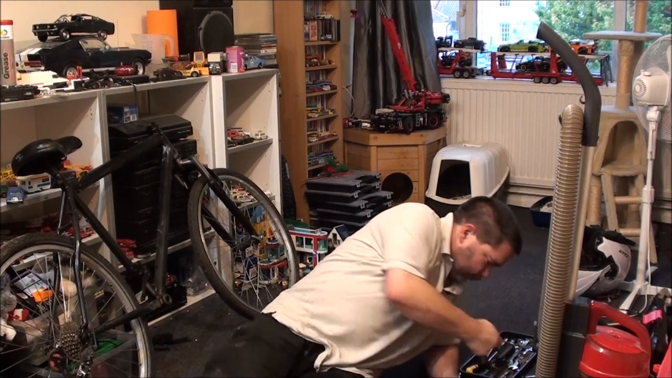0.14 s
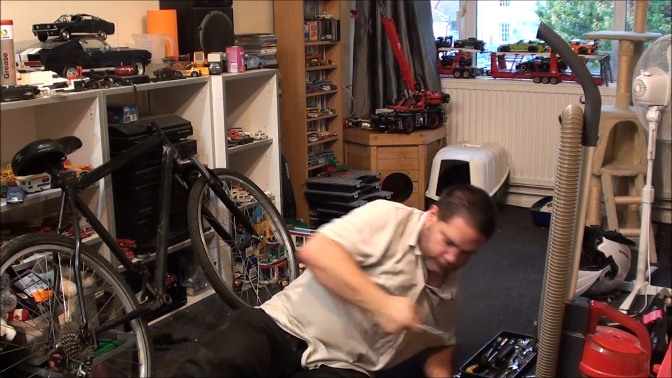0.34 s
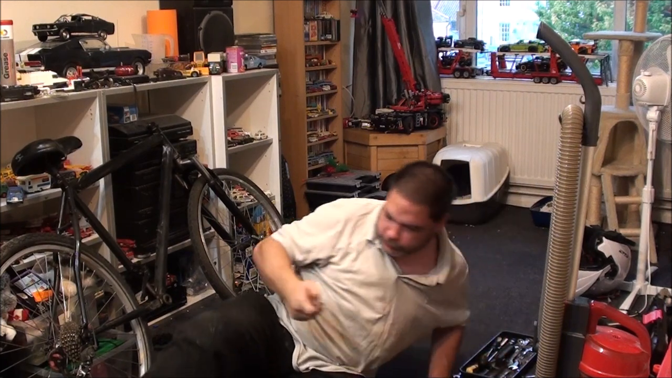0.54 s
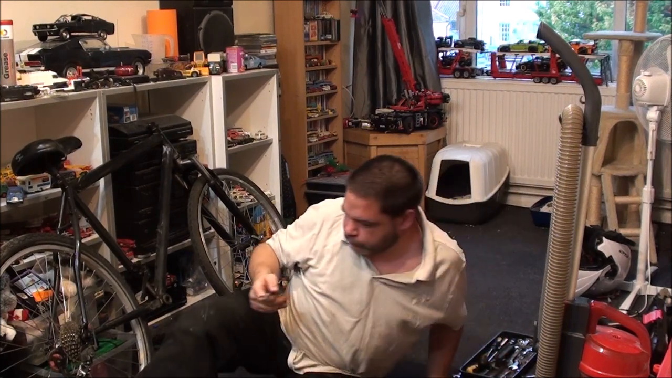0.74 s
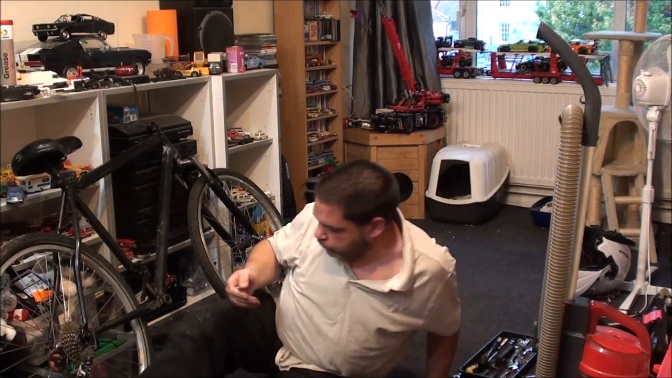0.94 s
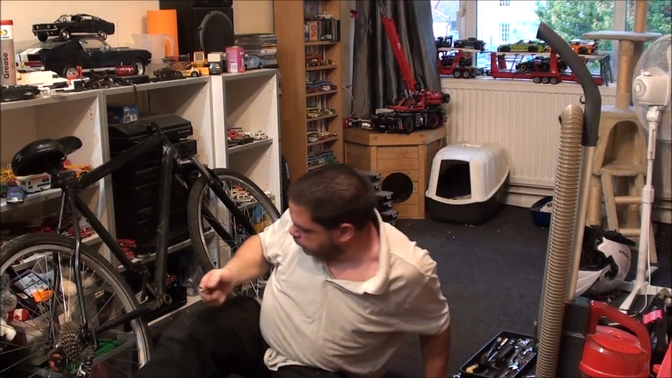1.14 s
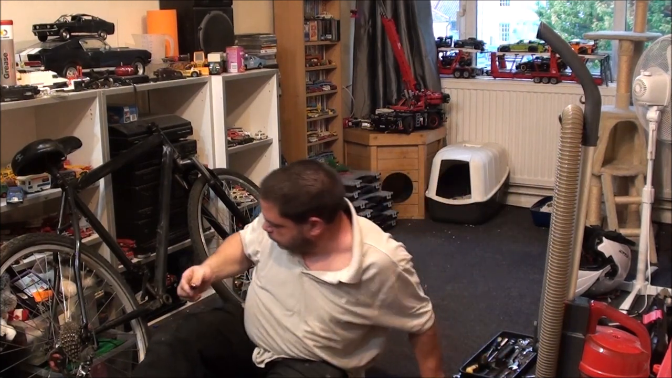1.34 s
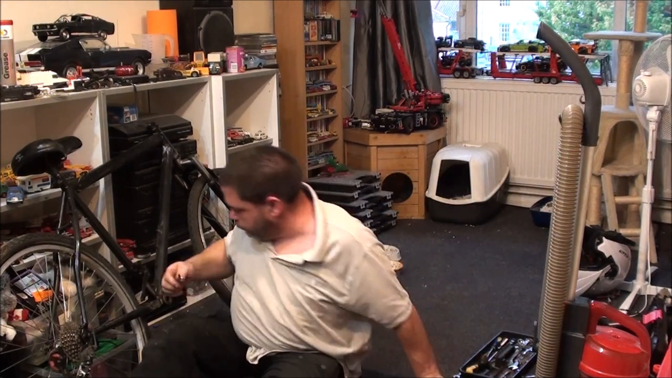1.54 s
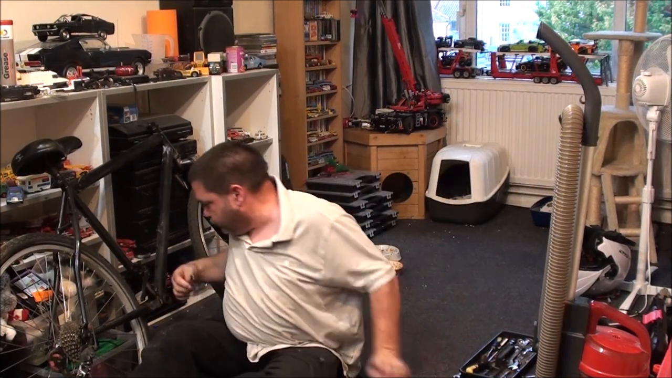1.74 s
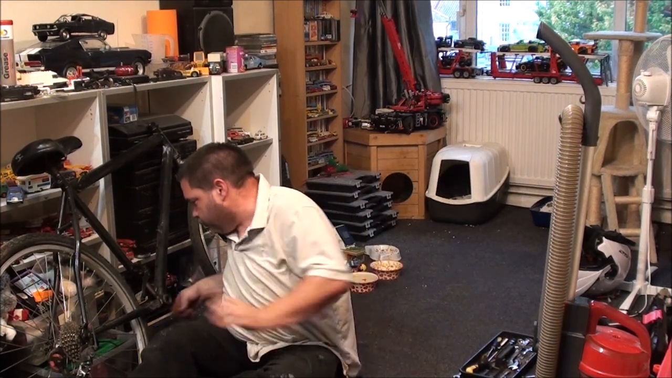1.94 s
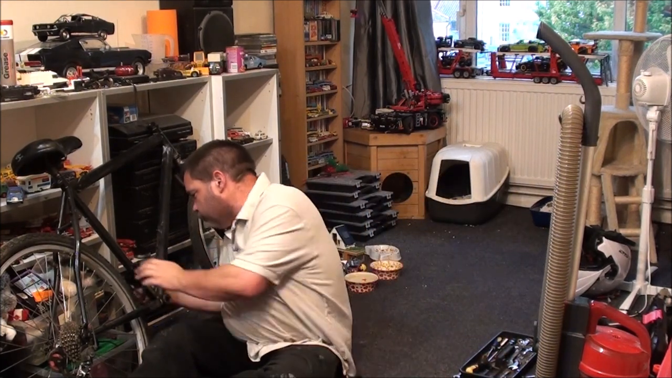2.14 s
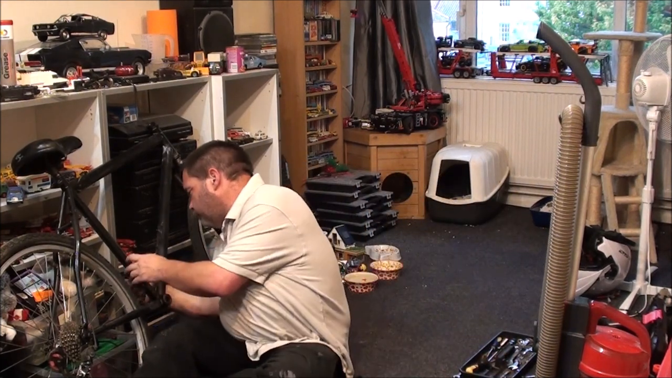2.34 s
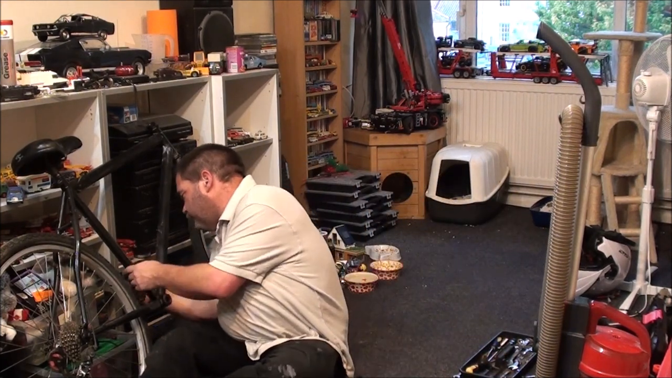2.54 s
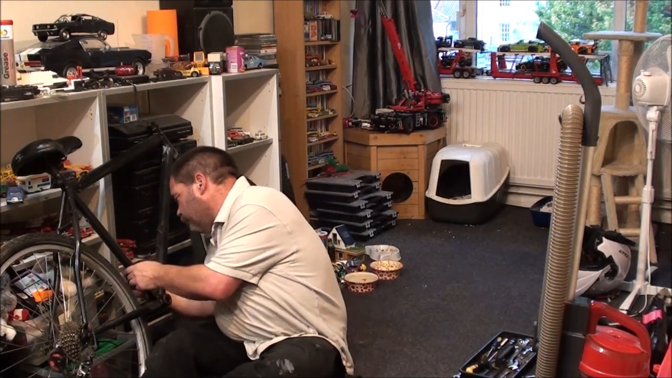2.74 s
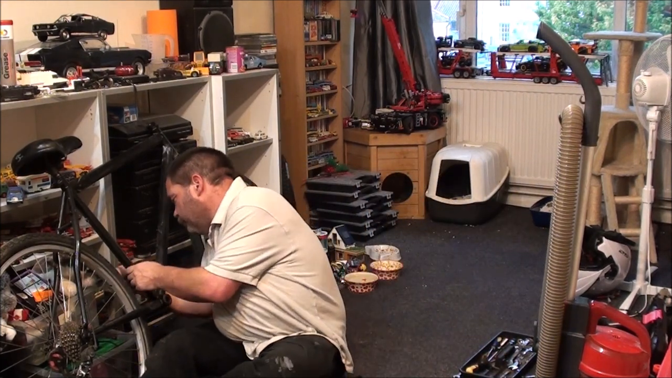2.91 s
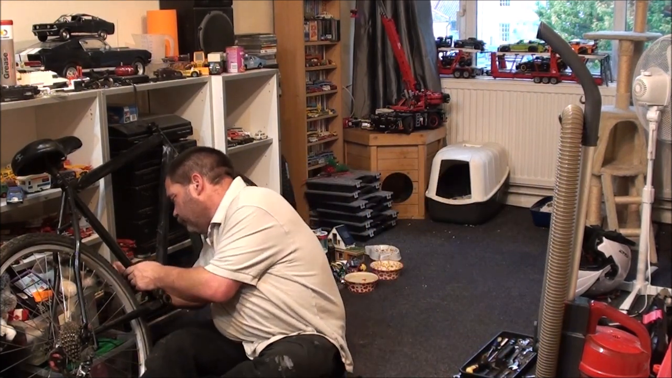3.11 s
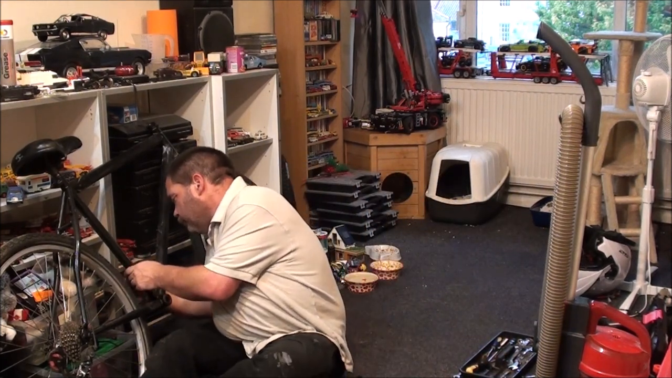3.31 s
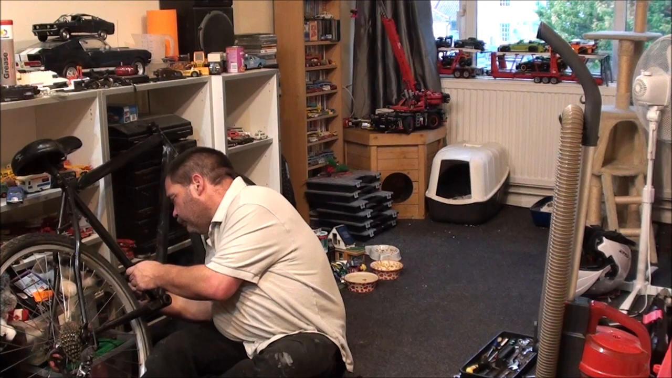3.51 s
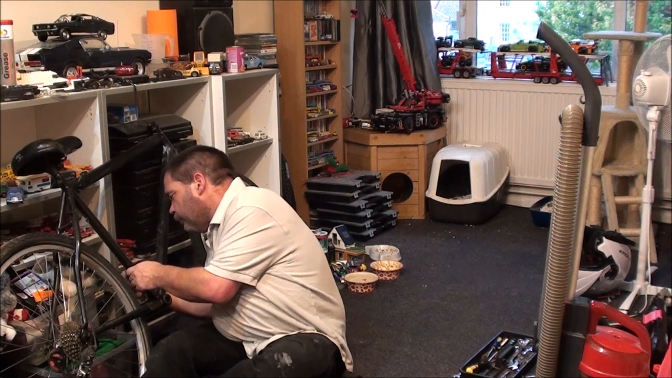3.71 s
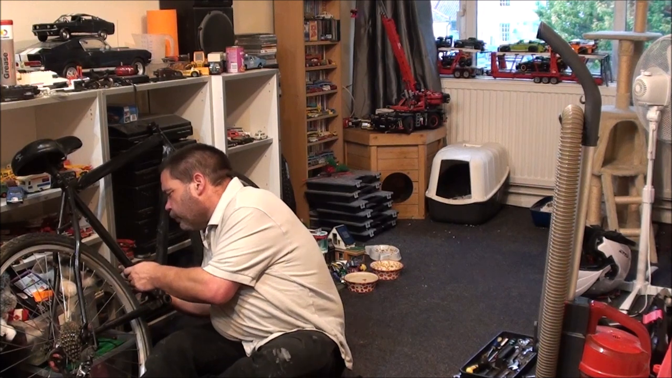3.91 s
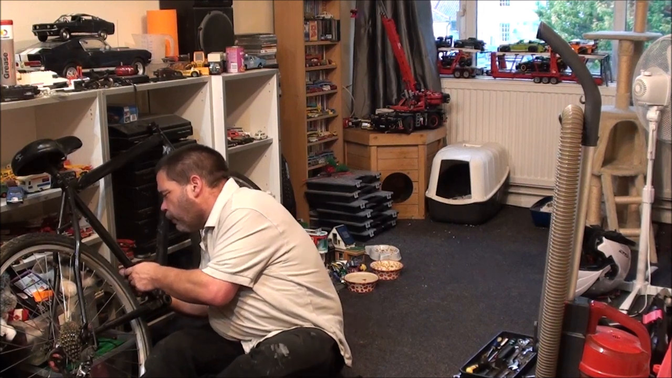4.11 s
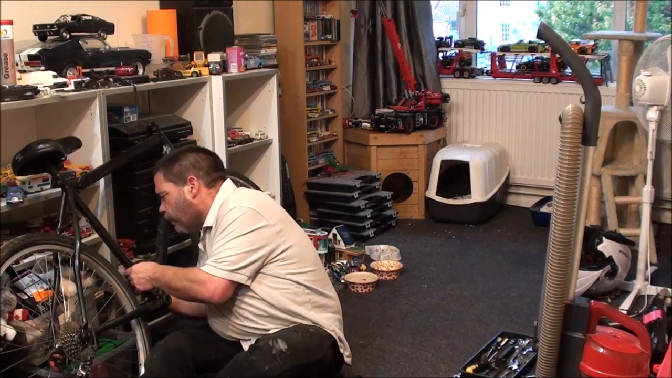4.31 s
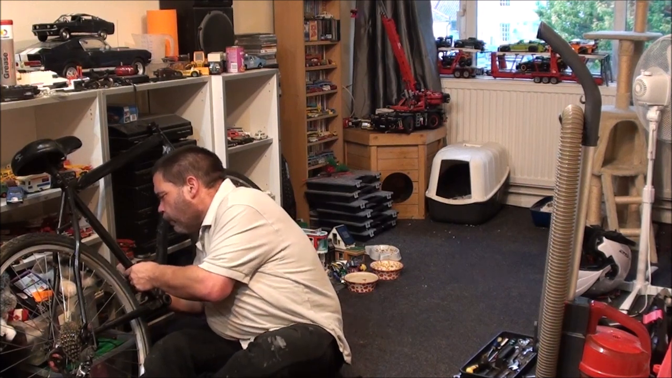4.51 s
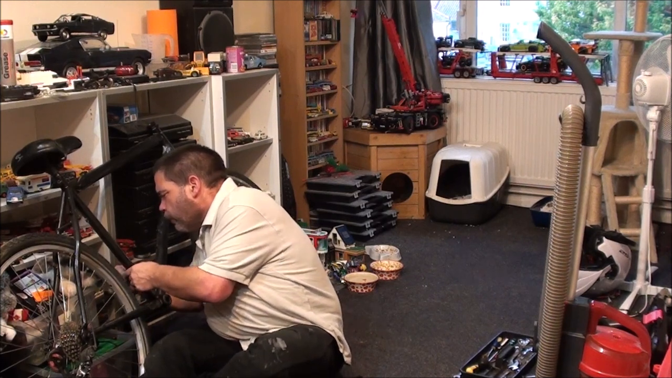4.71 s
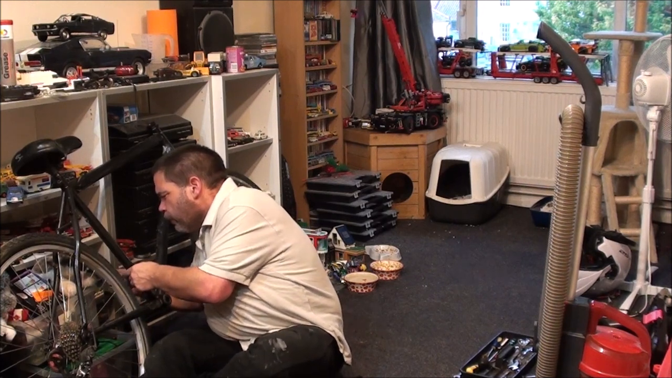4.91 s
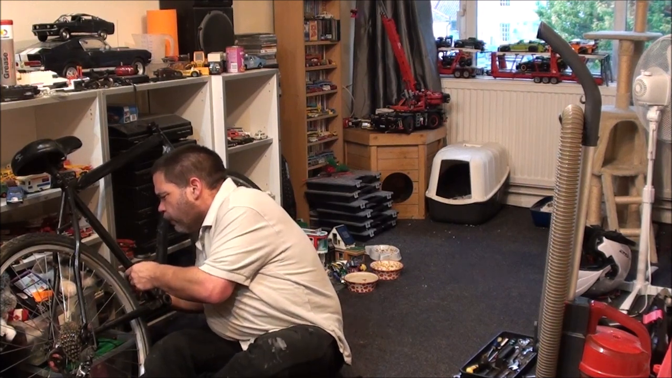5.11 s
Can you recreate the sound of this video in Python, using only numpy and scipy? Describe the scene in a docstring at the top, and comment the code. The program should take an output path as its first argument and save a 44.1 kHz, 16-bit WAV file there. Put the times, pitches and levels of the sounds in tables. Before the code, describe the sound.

In a small, cluttered carpeted room, a quiet fan gives a wavering mid-low tone over faint hum, hiss and air. Within the first 0.1 s, tiny bright steel clinks speed into a stronger ringing touch and a duller double clack as tools fall back in a tray. Cloth rubs at the start and again around 0.3 s; at 0.44-0.49 s the plastic tray gives three rapid hollow knocks. Shirt rustle continues near 0.6 and 0.9 s, with a soft thump on the carpet, then a fainter rub around 1.5 s. A light metallic snap comes at 2.4 s, a harder one at 2.65 s amid rustling. At 3.36 s a very loud, bright metal crack rings briefly in short dense echoes, and the recording level drops, recovering slowly. A barely audible tick follows at 4.05 s, a modest duller clack at 4.37 s, a tiny dry click at 4.55 s and faint cloth movement.

```python
"""Small, cluttered room: a man picks a steel tool out of a plastic tray; tools clink, the tray knocks on the floor.
His shirt rustles as he sits up and turns to a bicycle, where the tool snaps against a fitting a few times.
Blows are contact clicks plus damped modes, heard through dense echoes; rubs and thumps are swelling noise.
A fan hums quietly: a wavering tone over faint hum, hiss and air noise.
The loudest snap pushes the recorder's gain down, and it creeps back slowly."""
import sys
import numpy as np
from scipy import signal
from scipy.fft import rfft, irfft
from scipy.io import wavfile
from scipy.ndimage import uniform_filter1d

SR = 44100
rng = np.random.default_rng(int(sys.argv[2]) if len(sys.argv) > 2 else 0)


def persist_wave(psi):
    """Save psi, clipped to +-1, as 16-bit WAV."""
    counts = np.round(np.clip(psi, -1, 1) * 32767).astype(np.int16)
    wavfile.write(sys.argv[1], SR, np.atleast_2d(counts).T)


N = 227458
T = np.arange(N) / SR
HZ = np.arange(N // 2 + 1) * SR / N

# contact spectrum of steel on steel: freq_hz, relative_db
STEEL_CONTACT = [(1000, -4.5), (2500, -3), (5500, -6), (8000, -1), (12000, -5), (16000, -11)]
# stereo width of the echoes of near sounds: freq_hz, side_to_mid_db
ROOM_STEREO = [(150, -43), (600, -19), (1200, -15), (2000, -15.5), (4000, -13), (8000, -13), (12000, -20),
               (16000, -31)]


def from_db(db):
    """Decibels to gain."""
    return 10 ** (np.asarray(db) / 20)


def rms_one(x):
    """Scale to rms 1."""
    return x / np.sqrt(np.mean(x ** 2) + 1e-20)


def blow_level(x):
    """Scale a blow so that its energy equals that of rms 1 for a fiftieth of a second."""
    return x / np.sqrt(np.sum(x ** 2) / (SR / 50) + 1e-20)


def at_hz(points, hz):
    """Read a table on a log-frequency axis."""
    freq_hz, value = np.transpose(points)
    return np.interp(np.log(np.maximum(hz, 1)), np.log(freq_hz), value)


def wander(turns_per_s):
    """Random line of spread about 1 with this many turns a second."""
    return np.interp(T * turns_per_s, np.arange(N), rng.standard_normal(N))


def swells(rows, steepness=2.36):
    """Gain over time: each row (middle_s, length_s, level_db) exceeds half its height for its length."""
    gain = 0
    for middle_s, length_s, level_db in rows:
        offset = np.abs(2 * (T - middle_s) / length_s)
        gain = gain + from_db(level_db) * .5 ** (offset ** steepness)
    return gain


def noise(gain, stereo):
    """Stereo noise of rms 1 with this gain per frequency and this stereo width."""
    mid, side = rfft(rng.standard_normal((2, N))) * gain
    side = side * from_db(at_hz(stereo, HZ))
    return rms_one(irfft([mid + side, mid - side], N))


def tone(hz, level_db, waver_db=3.0, waver_radians=0.31):
    """Sine around this rms level that wavers a little in level and phase."""
    amplitude = np.sqrt(2) * from_db(level_db + waver_db * wander(4.57))
    return amplitude * np.sin(2 * np.pi * hz * T + waver_radians * wander(5.7))


def contact(spectrum, colour=lambda hz: 0, size=4096):
    """Contact click: the shortest causal (minimum-phase) pulse with this spectrum."""
    hz = np.arange(size // 2 + 1) * SR / size
    cepstrum = irfft(np.log(from_db(at_hz(spectrum, hz) + colour(hz))))
    causal = 2 * cepstrum[:size // 2]
    return blow_level(irfft(np.exp(rfft(causal, size))))


def ringing(modes, colour=lambda hz: 0, rise_s=0.00055):
    """Damped sines of a struck body; later echoes make each one flutter in level and phase."""
    t = T[:SR // 2]
    turns = t * 90   # echo changes, 90 per second
    # the first instant is pure direct sound, then the echoes take their share
    echo_share = 1 - np.exp(-t / .02)
    rise = 1 - np.exp(-t / rise_s)   # the blow takes a moment to spread
    out = 0
    for hz, db, t60_s in modes:
        echo_points = rng.standard_normal(64) + 1j * rng.standard_normal(64)
        echoes = np.interp(turns, np.arange(64), echo_points)
        wave = (1 + echo_share * echoes) * np.exp(2j * np.pi * (hz * t + rng.random()))
        envelope = np.exp(-np.log(1000) * t / t60_s) * rise
        out = out + from_db(db + colour(hz)) * blow_level(wave.real * envelope)
    return blow_level(out)


def play(hits, sound):
    """Place a sound at each (start_s, level_db)."""
    out = np.zeros(N)
    for start_s, level_db in hits:
        start = max(round(start_s * SR), 0)
        out[start:start + len(sound)] += from_db(level_db) * sound[:N - start]
    return out


def room_response(direct_db=-17, lumpy_db=1.5):
    """Clutter scatters the sound at once into dense echoes, which die soonest in the top treble."""
    # reverberation: freq_hz, t60_s
    decay = [(150, 0.27), (600, 0.19), (1500, 0.21), (4000, 0.23), (7000, 0.21), (11000, 0.17),
             (16000, 0.12)]
    t = T[:SR // 2]
    lumpy_noise = noise(1, ROOM_STEREO) * from_db(lumpy_db * wander(689))
    echoes = rfft(lumpy_noise[:, :len(t)])
    hz = np.linspace(0, SR / 2, echoes.shape[1])
    centres_hz = [freq_hz for freq_hz, t60_s in decay]
    out = 0
    for (freq_hz, t60_s), only_this in zip(decay, np.eye(len(centres_hz))):
        band = irfft(echoes * np.interp(hz, centres_hz, only_this), len(t))
        out = out + band * np.exp(-np.log(1000) * t / t60_s)
    out = out / np.sqrt(np.sum(out ** 2) / 2)
    out[:, 0] += from_db(direct_db)
    return out


def in_room(crack, ring, ring_wet_db):
    """The crack of a blow arrives mostly as echoes; the ring comes straight and with a share of them."""
    sent = crack + from_db(ring_wet_db) * ring
    return ring + signal.fftconvolve([sent], room_response(), axes=1)[:, :N]


def struck(hits, spectrum, modes, crack_db, ring_db, ring_wet_db):
    """Blows on one body: a contact click and its modes."""
    crack = from_db(crack_db) * play(hits, contact(spectrum))
    ring = from_db(ring_db) * play(hits, ringing(modes))
    return in_room(crack, ring, ring_wet_db)


def lifted_tool():
    """The steel tool being lifted: light touches excite its modes."""
    # touches: start_s, level_db
    hits = [(.018, -27.5), (.0305, -23.5), (.041, -35.5)]
    # modes: freq_hz, relative_db, t60_s
    modes = [(1160, -2.5, 0.14), (2150, -6, 0.099), (5090, -6, 0.11), (5570, -11, .1), (5660, -13, 0.088),
             (6440, 2, 0.078), (7200, -8, 0.12), (9250, -13, .1), (10800, -17, .2), (11740, -2, 0.17),
             (12910, -14, .13)]
    return struck(hits, STEEL_CONTACT, modes, crack_db=-10.5, ring_db=-1.0, ring_wet_db=-18)


def bumped_tool():
    """The tool it bumps into: steel contact and high modes."""
    # touches: start_s, level_db
    hits = [(.0725, -18), (.0855, -27)]
    # modes: freq_hz, relative_db, t60_s
    modes = [(6280, -5, 0.2), (7140, -1, 0.26), (8543, -7.5, 0.24), (9800, -18, 0.4), (11380, 3, 0.2),
             (11600, -15, 0.17), (12330, -13, 0.23), (14050, -12, 0.18), (14800, -10, .17)]
    return struck(hits, STEEL_CONTACT, modes, crack_db=-9.5, ring_db=1.0, ring_wet_db=-18)


def dropping_tools():
    """Tools dropping back among the others: a duller clack and lower modes."""
    # blows: start_s, level_db
    hits = [(.0855, -15), (.0995, -19.5)]
    # modes: freq_hz, relative_db, t60_s
    modes = [(870, -4, 0.29), (919, 3.5, 0.091), (1090, 3, 0.14), (1157, 0, 0.17), (1286, -5, 0.16),
             (2110, 0, 0.26), (2440, -7.5, 0.17), (3810, -4.5, 0.071), (4506, -17, .16), (4900, -18, .17),
             (5109, -18, .15)]
    # contact spectrum: freq_hz, relative_db
    clack = [(100, -41), (200, -18), (550, -6.5), (900, 1), (1250, -3), (1700, -6), (2300, -6), (2900, -15),
             (4500, -14), (7000, -14.5), (10000, -25), (16000, -38)]
    return struck(hits, clack, modes, crack_db=-1, ring_db=-3, ring_wet_db=-14.5)


def rocking_tray():
    """The plastic tray rocking on the floor: low knocks on its modes."""
    # blows: start_s, level_db
    hits = [(.4378, -12.5), (.4598, -15), (.4875, -12)]
    # modes: freq_hz, relative_db, t60_s
    modes = [(405.7, -1, 0.14), (458, -3.5, 0.18), (553, -4, 0.23), (588, -2, 0.12), (633, 5, 0.15),
             (679, -4.5, 0.155), (716, 1.5, 0.14), (775, -5, 0.19), (994, -14, 0.18), (1103, -4.5, 0.14),
             (1250, -20, 0.14), (1306, -10, 0.11), (1603, -7, 0.073), (1984, -10.5, 0.07)]
    # contact spectrum: freq_hz, relative_db
    knock = [(100, -64), (250, -18.5), (400, -5.5), (650, -2), (900, -6), (1150, -8), (1600, -13),
             (2000, -19.5), (2350, -26), (4500, -28.5), (8000, -36.5), (11000, -44), (16000, -65)]
    return struck(hits, knock, modes, crack_db=-2.0, ring_db=2, ring_wet_db=-28)


def snap(start_s, level_db, low_db, mid_db, edge_db, bright_hz,
         ring_db=-6, steep=5.1, body_db=7, body_width_hz=90):
    """The tool slips on the fitting; how it lands sets the weight of the modes and where the treble ends."""
    # contact spectrum: freq_hz, relative_db
    crack_spectrum = [(120, -32), (330, -30), (700, -12.5), (1100, -14.5), (1800, -13), (2350, -8.5),
                      (2800, -16), (3400, -8.5), (4500, -9), (5700, -4), (6700, 1.5), (7600, -3),
                      (10300, -5), (16000, -6)]
    # modes of tool and frame: freq_hz, relative_db, t60_s
    modes = [(346, -12.5, 0.49), (1100, -10.5, 0.24), (1514, -13, 0.23), (2310, -11, 0.066),
             (2300, -17.5, 0.74), (2530, -5, 0.35), (2800, -8, 0.26), (3160, -9, 0.24), (3350, -12.5, 0.4),
             (3616, -0.5, 0.08), (4150, -50, 0.063), (4350, -7.5, 0.055), (5130, -2, .16), (5685, -2, 0.24),
             (5780, 5, 0.18), (6300, -20, 0.25), (6500, 1, 0.23), (6920, -6, 0.34), (6820, 4, 0.25),
             (7720, 6, 0.16), (8240, -8, 0.083), (8080, -11, 0.096), (8725, 8.5, 0.13), (9450, -21, 0.085),
             (10300, -8, .15), (10600, 2, 0.098), (11300, -10, .13)]

    def colour(hz):
        """Tilt of this one blow, in dB."""
        weight_db = at_hz([(1200, low_db), (2300, mid_db), (3500, mid_db), (4400, edge_db), (5800, 0)], hz)
        return weight_db - 10 * np.log10(1 + (hz / bright_hz) ** (2 * steep))

    def through_body(hz):
        """The crack too leaves through the metal, strongest near its modes."""
        nearest_hz = np.min([np.abs(hz - mode[0]) for mode in modes], axis=0)
        return colour(hz) + body_db / (1 + (nearest_hz / body_width_hz) ** 2)

    crack = play([(start_s, level_db)], contact(crack_spectrum, through_body))
    ring = play([(start_s, level_db + ring_db)], ringing(modes, colour))
    return in_room(crack, ring, ring_wet_db=-18)


def snaps_on_fitting():
    """The tool snapping on the bicycle fitting, each blow with its own tilt."""
    # snaps: start_s, level_db, low_knock_db, mid_clack_db, hard_edge_db, treble_end_hz
    rows = [(2.3785, -22.5, 7.5, -0.5, 1, 7400), (2.6488, -16.5, 8, 9, 13.5, 10700),
            (3.362, 4, -1.5, -1, -9.5, 12100), (4.0531, -38, 7, 10.5, 2, 10800),
            (4.3661, -19, 14.5, 11, 10, 7800)]
    return sum(snap(*row) for row in rows)


def dry_edges():
    """Crisp dry edges of the three tray knocks, and one click at the bicycle, all without echoes."""
    # clicks: start_s, level_db
    hits = [(.438, -37.5), (.4603, -41), (.4878, -35), (4.5517, -46)]
    # contact spectrum: freq_hz, relative_db
    click = [(1000, -25), (3000, 5), (5000, 3.5), (8000, 6), (10500, -5), (13000, -19), (16000, -23)]
    return play(hits, contact(click))


def shirt_and_weight(grain_db=1.2, grains_per_s=250, body_rumble_db=-15.5):
    """The shirt rubs in small uneven catches; shifting weight thumps softly on the carpet."""
    # reach, pull back, push up, sit, turn, three pulls on the tool: middle_s, length_s, level_db
    rubs = [(.03, 0.21, -35), (.32, 0.19, -33.5), (.635, 0.13, -37.5), (.9, .19, -37.5), (1.55, 0.41, -47),
            (2.55, 0.33, -40), (2.95, 0.47, -50.5), (4.7, .3, -52.5)]
    # weight settling on the carpet: middle_s, length_s, level_db
    thumps = [(.35, 0.16, -43.5), (.905, 0.054, -35), (1.0, 0.11, -45), (2.54, 0.19, -46),
              (3.26, 0.18, -44.5)]
    # spectrum of the rubbing shirt: freq_hz, relative_db
    cloth_spectrum = [(150, -25), (300, -3), (550, -3.5), (1100, -5.5), (1700, -8.5), (2800, -15.5),
                      (4500, -13.5), (6000, -16.5), (7500, -12), (10000, -20.5), (15000, -36)]
    # spectrum of the thumps and body rumble: freq_hz, relative_db
    thump_spectrum = [(60, -31), (120, -23), (180, 4), (300, 3.5), (500, -15), (800, 3), (1500, -40),
                      (4000, -58)]
    motion = swells(rubs)
    catches = from_db(grain_db * wander(grains_per_s))
    rub = motion * catches * noise(from_db(at_hz(cloth_spectrum, HZ)), ROOM_STEREO)
    # the moving body rumbles low under every rub
    weight = swells(thumps) + from_db(body_rumble_db) * motion
    return rub + weight * noise(from_db(at_hz(thump_spectrum, HZ)), ROOM_STEREO)


def fan():
    """The fan's main tone, wavering and drifting slowly in level."""
    # level path: time_s, level_db
    level = [(0, -45.5), (1.6, -49.5), (2.3, -46), (3.2, -46.5), (4.2, -52), (4.95, -45)]
    return tone(543.6, np.interp(T, *np.transpose(level)))


def hum():
    """Faint, slightly wavering tones of mains, fan and electronics."""
    # tones: freq_hz, level_db
    tones = [(100, -58.5), (181, -54.5), (440, -60), (15190, -72)]
    return sum(tone(hz, level_db) for hz, level_db in tones)


def air_and_hiss(air_db=-41):
    """Steady room air noise and bands of hiss."""
    # air spectrum density: freq_hz, relative_db
    air_spectrum = [(15, -45), (25, -22), (45, -7), (90, -6.5), (125, -12), (190, -1.5), (400, -5.5),
                    (600, -7), (1000, -7.5), (1700, -12), (2700, -16), (7200, -19.5), (11000, -22),
                    (15800, -23.5)]
    # hiss bands: centre_hz, width_hz, level_db
    hiss_bands = [(187, 91, -60), (4050, 48, -60.5), (7090, 1100, -58)]
    # stereo width of the far noise: freq_hz, side_to_mid_db
    far_stereo = [(40, -24), (150, -20), (500, -8), (1300, -6), (4000, -6), (8000, -9), (12000, -42),
                  (16000, -36)]
    out = from_db(air_db) * noise(from_db(at_hz(air_spectrum, HZ)), far_stereo)
    for centre_hz, width_hz, level_db in hiss_bands:
        band = 1 / (1 + (2 * (HZ - centre_hz) / width_hz) ** 2)
        out = out + from_db(level_db) * noise(band, far_stereo)
    return out


def scene():
    """The rummage in the tray, then the work on the bicycle."""
    tray_sounds = lifted_tool() + bumped_tool() + dropping_tools() + rocking_tray()
    handling = snaps_on_fitting() + dry_edges() + shirt_and_weight()
    background = fan() + hum() + air_and_hiss()
    balance_db = [[.2], [-.2]]   # first channel, second channel
    return (tray_sounds + handling + background) * from_db(balance_db)


def gain_control(x, threshold_db=-12, sense_hz=3000, held_share=0.47, fast_db_per_s=400, slow_db_per_s=1.44):
    """Treble-sensitive limiter: it lets go quickly at first, but part of the cut is held and fades slowly."""
    sense = signal.butter(2, sense_hz, "high", fs=SR, output="sos")
    treble = signal.sosfilt(sense, x.mean(axis=0))
    level_db = 10 * np.log10(np.maximum(uniform_filter1d(treble ** 2, size=160), 1e-12))
    over_db = np.maximum(level_db - threshold_db, 0)
    held_db = held_share * uniform_filter1d(over_db, size=600)
    # running maxima against a ramp: each cut falls at a constant rate in dB
    fast_db = np.maximum.accumulate(over_db + fast_db_per_s * T) - fast_db_per_s * T
    slow_db = np.maximum.accumulate(held_db + slow_db_per_s * T) - slow_db_per_s * T
    return x * from_db(-np.maximum(fast_db, slow_db))


def record(dry, low_cut_hz=32, top_cut_hz=15900):
    """Microphone low cut, gain control, rounded peaks and a steep top cut."""
    low_cut = signal.butter(2, low_cut_hz, "high", fs=SR, output="sos")
    held = gain_control(signal.sosfilt(low_cut, dry))
    rounded = held / (1 + held ** 6) ** (1 / 6)
    top_cut = signal.ellip(10, .1, 90, top_cut_hz, fs=SR, output="sos")
    return signal.sosfilt(top_cut, rounded)


dry = scene()
out = record(dry)
persist_wave(out)
```